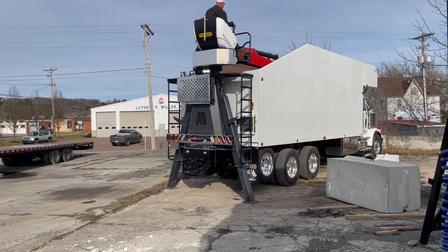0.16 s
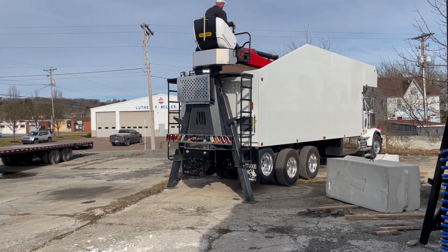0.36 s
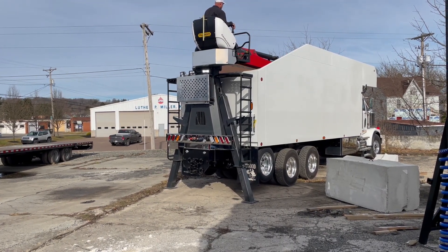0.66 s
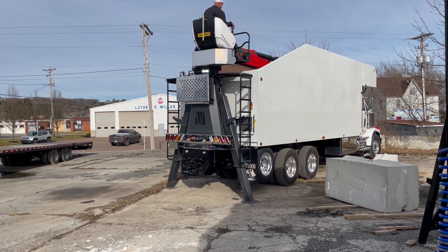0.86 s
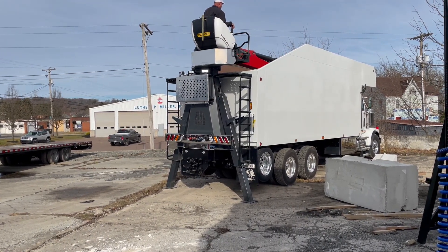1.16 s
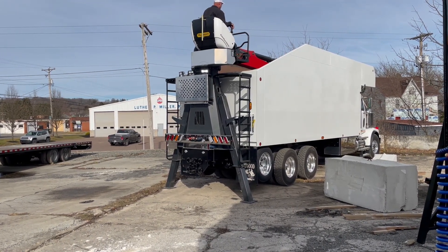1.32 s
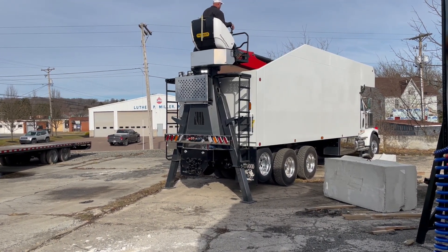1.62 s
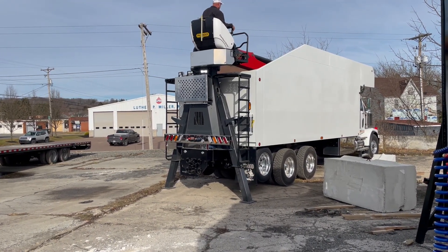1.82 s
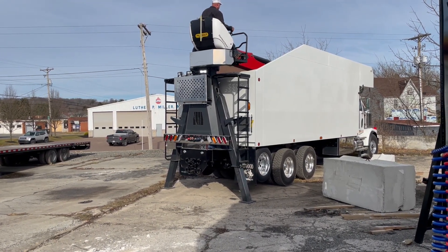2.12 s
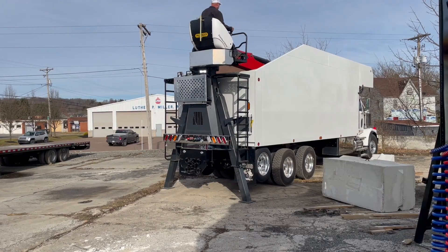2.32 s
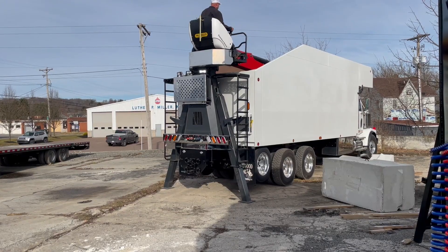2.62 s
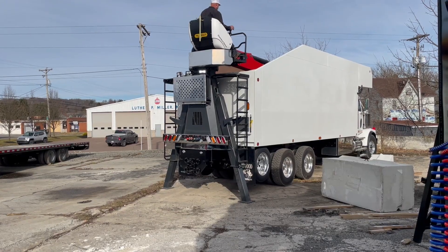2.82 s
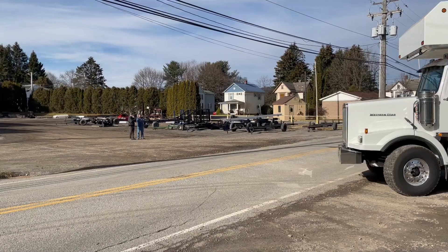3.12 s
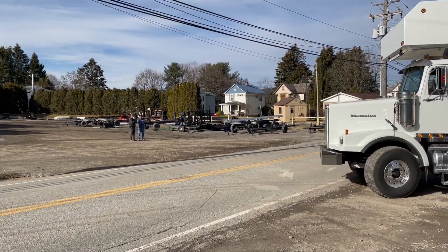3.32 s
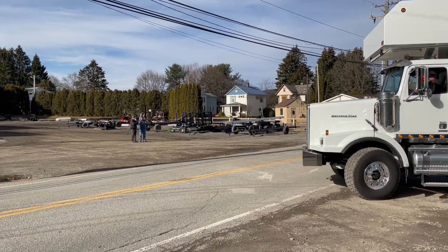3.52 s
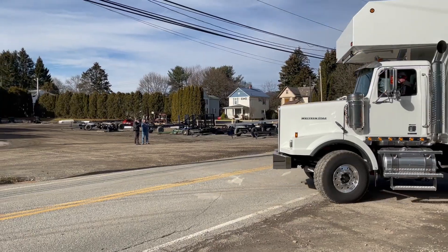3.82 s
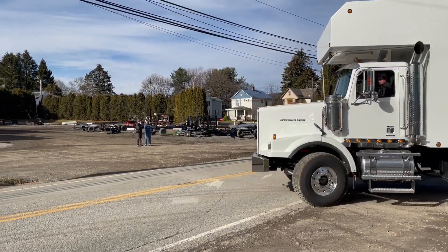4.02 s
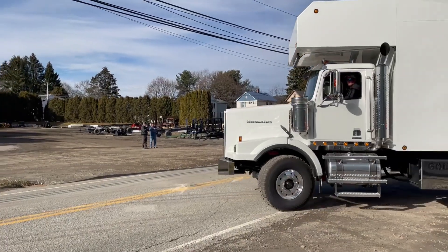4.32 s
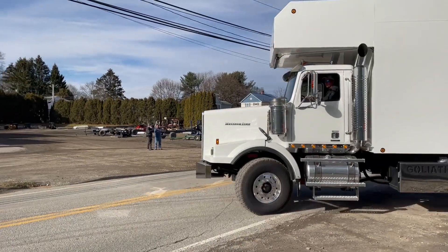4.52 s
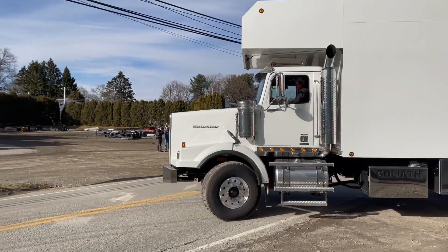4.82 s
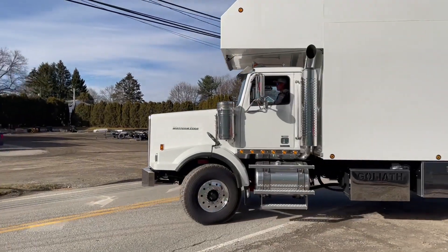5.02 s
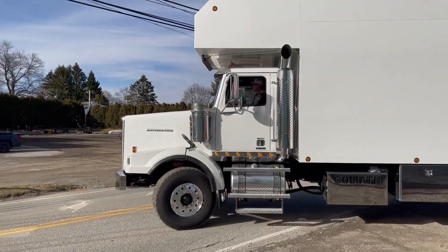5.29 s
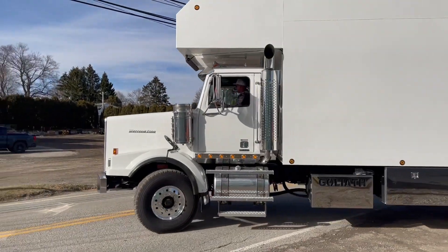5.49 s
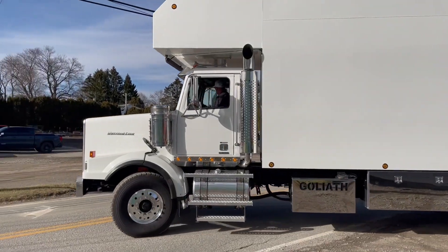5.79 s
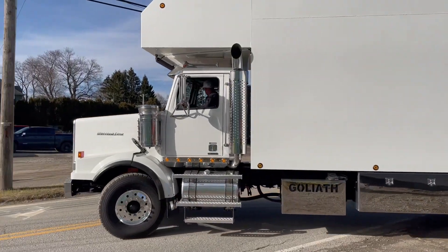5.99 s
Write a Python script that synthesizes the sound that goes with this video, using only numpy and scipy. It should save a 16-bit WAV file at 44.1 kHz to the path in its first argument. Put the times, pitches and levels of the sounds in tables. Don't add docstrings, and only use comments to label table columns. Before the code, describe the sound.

From 0 to 3.1 seconds, a heavy diesel idles fast and steadily in an open yard, its low note deepening under load around 1 second. A hydraulic pump drones near 220 Hz, stronger from 0.1 to 1.1 and again from 2.4, with a thin whine until 1.4. Bright oil hiss sags and nearly shuts off by 2.85. Irregular gusts thump the microphone, notably around 0.55, 1.05 and 2.0. A very brief silence follows, then a hard cut: sharp brake-air puffs at 3.13 and 3.2, with a longer sigh at 3.7. Close by, the truck accelerates, exhaust roar, metallic knock and breathy turbo whistle rising until 4.5. It lifts off; gears rattle, air dumps and a high whistle spins downward as revs fall. From 5.6 tyres scrub with a thin squeal, and at 5.8 the engine pulls again, deep and loud, to the end.

```python
import sys
import numpy as np
from scipy import signal
from scipy.fft import rfft, irfft, next_fast_len
from scipy.io import wavfile
from scipy.ndimage import uniform_filter1d

SR = 44100
rng = np.random.default_rng(int(sys.argv[2]) if len(sys.argv) > 2 else 0)


def pcm_store(signal):
    levels = np.round(np.clip(np.atleast_2d(signal), -1, 1) * 32767)
    wavfile.write(sys.argv[1], SR, levels.astype(np.int16).T)


def gain_from_db(level_db):
    decades = np.asarray(level_db, float) / 20
    return 10 ** decades


N = 271215
TIME_S = np.arange(N) / SR
SIZE = next_fast_len(N + SR)
FREQ = np.arange(SIZE // 2 + 1) * SR / SIZE + 1e-3

# (time [s], firing rate [Hz], exhaust level [dB], throttle [0-1])
DRIVE = [(3.11, 70.48, -11, 0.97), (3.36, 75.78, -11, 1), (3.62, 81.79, -18, 0.97),
         (3.9, 88.2, -15.5, 0.99), (4.33, 91.2, -15, 0.94), (4.5, 90.8, -19, 0.84), (4.6, 82.4, -25, 0.37),
         (5.0, 68.16, -37, 0.3), (5.72, 56.98, -47, 0.05), (5.81, 59.8, -17, 1), (5.9, 62.54, -13, 1),
         (6.15, 65.8, -14.5, 0.98)]


def unit(x):
    return x / np.sqrt(np.mean(x ** 2))


def in_band(x, lo_hz, hi_hz):
    sos = signal.butter(4, [lo_hz, hi_hz], "band", fs=SR, output="sos")
    return x / np.std(signal.sosfilt(sos, x))


def curves(table):
    s, *columns = np.transpose(table)
    return [np.interp(TIME_S, s, c) for c in columns]


def shape(points):
    hz, value = np.transpose(points)
    return np.interp(np.log(FREQ), np.log(hz + 1), value, left=value[0], right=value[-1])


def span(start_s, end_s, edge_s):
    return np.clip(np.minimum(TIME_S - start_s, end_s - TIME_S) / edge_s + 0.5, 0, 1)


def walk(rate_hz):
    k = int(SR / rate_hz)
    held = np.repeat(rng.standard_normal(N // k + 1), k)
    return 1.24 * uniform_filter1d(uniform_filter1d(held, k), k)[:N]


def ring(x, modes):
    out = 0
    for k, (hz, width_hz, db) in enumerate(modes):
        b, a = signal.iirpeak(hz, hz / width_hz, fs=SR)
        out = out + (-1) ** k * gain_from_db(db) * signal.lfilter(b, a, x)
    return out


def hiss(points, gate, flicker_db, rate_hz):
    spectrum = rfft(gate * rng.standard_normal(N), SIZE) * gain_from_db(shape(points))
    lo, hi = points[0][0] / 2, points[-1][0] * 2
    spectrum[(FREQ < lo) | (FREQ > hi)] = 0
    place, out = np.log2(FREQ), 0
    for octave in range(5, 15):
        if lo / 2 < 2 ** octave < hi * 2:
            band = irfft(spectrum * np.clip(1 - abs(place - octave), 0, 1), SIZE)[:N]
            out = out + gain_from_db(flicker_db * walk(rate_hz)) * band
    return out


def tone(hz, wobble_db=2.1, wander=0.1):
    level = np.sqrt(2) * gain_from_db(wobble_db * walk(14))
    return level * np.sin(2 * np.pi * np.cumsum(hz) / SR + wander * walk(9))


def whistle(hz, width_hz):
    sos = signal.butter(2, width_hz / 2, fs=SR, output="sos")
    slow = signal.sosfilt(sos, rng.standard_normal((2, N)))
    return unit(np.real((slow[0] + 1j * slow[1]) * np.exp(2j * np.pi * np.cumsum(hz) / SR)))


def firing(hz, uneven, scatter_db, tail):
    cylinders_db = [-3.5, -2.5, -5.5, -5.5, -2, -2.5]
    turns = np.cumsum(hz) / SR
    count = turns.astype(int)
    chance_db = scatter_db * rng.standard_normal(N // 100)[count]
    size = gain_from_db(uneven * np.array(cylinders_db)[count % 6] + chance_db)
    return size * np.diff(count, prepend=0), size * np.exp(-(turns - count) / tail)


def ports(x, lead, balance, echo):
    t60_s = 0.3
    tail = rng.standard_normal(SR // 2) * gain_from_db(-60 * np.arange(SR // 2) / SR / t60_s)
    tail = rfft(tail / np.linalg.norm(tail), SIZE) * gain_from_db(shape(echo))
    half = gain_from_db(shape(balance) / 2) * np.exp(0.5j * np.interp(FREQ, *np.transpose(lead)))
    both = np.array([half * (1 + tail), (1 - tail) / half])
    return irfft(rfft(x, SIZE) * both, SIZE)[:, :N]


def layer(name):
    # (full-throttle level [dB], loss off throttle [dB], slope with speed [dB/Hz], slope in passing [dB/s])
    layers = dict(stack=(-27, 33, 0.11, -3), roar=(-25, 6.0, 0.1254, 0.86), knock=(-31, 13, 0.19, -0.3),
              air=(-35.5, 0, -0.0365, -2), fan=(-45.5, 7, 0.11, -1), rumble=(-32.5, 1, -0.05, 0.4))
    rattles = dict(case=(-46, -12.5, 0.02, 0), mesh=(-41.5, -8.5, 0.02, 0))
    full_db, lost_db, speed_db, past_db = {**layers, **rattles}[name]
    hz, _, throttle = curves(DRIVE)
    abreast_s = 4.5
    return gain_from_db(full_db - lost_db * (1 - throttle) + speed_db * (hz - 78.5) + past_db * (TIME_S - abreast_s))


def wind():
    # (middle [s], length [s], level [dB], tilt per depth [dB])
    gusts = [(0.014, 0.06, -42, -8), (0.251, 0.068, -21.5, -4.5), (0.393, 0.029, -22.5, -3.5),
             (0.454, 0.029, -22, -4.5), (0.565, 0.044, -15, -5.5), (0.856, 0.091, -23.5, -9),
             (0.957, 0.059, -19, -12.5), (1.063, 0.06, -16, -22), (1.19, 0.037, -20, -11),
             (1.271, 0.071, -23.5, 0.5), (1.48, 0.13, -27, -7), (1.64, 0.17, -37.5, 2),
             (1.983, 0.16, -17.5, -4.5), (2.066, 0.082, -27, -4), (2.164, 0.088, -24, -5),
             (2.304, 0.084, -23, -5.5), (2.495, 0.11, -31, -9), (2.704, 0.13, -28.5, -9)]
    breeze_db, breeze_tilt_db = -31.5, -5.5
    out, lumps = 0, gain_from_db(4.2 * walk(24.96))
    for depth, band_hz in enumerate([(45, 110), (110, 220), (200, 330)]):
        blow = gain_from_db(breeze_db + breeze_tilt_db * depth) * (0.75 + span(1.0, 2.62, 0.3))
        for s, length_s, db, tilt_db in gusts:
            blow = blow + gain_from_db(db + tilt_db * depth) * np.exp(-(2 * (TIME_S - s) / length_s) ** 2)
        noise = rng.standard_normal((2, N)) * lumps
        noise = noise[0] + 0.3 * noise[1] * np.array([[1], [-1]])
        noise = signal.sosfilt(signal.butter(3, band_hz, "band", fs=SR, output="sos"), noise)
        out = out + blow * noise / np.sqrt(uniform_filter1d(noise[0] ** 2, SR // 14) + 1e-9)
    return out


def pump():
    # (multiple of piston rate, lifting level [dB], settled level [dB])
    pump_orders = [(2, -52, -49), (2.2, -60, -47), (2.5, -54, -46), (3, -48, -56), (3.2, -43, -50),
                   (3.5, -45, -40), (4, -49, -56), (5, -50, -53), (5.45, -50, -47), (6, -51, -52),
                   (6.92, -48, -48)]
    # (start [s], end [s], level [dB])
    strokes = [
        (0.14, 1.07, -30.5),
        (2.38, 3.2, -29.5),
    ]
    # (start [s], end [s], frequency [Hz], level [dB])
    whines = [
        (-0.1, 0.8, 2092, -42),
        (0.82, 1.4, 2116, -48),
    ]
    # (time [s], drop [dB])
    shuts = [
        (2.4, 6),
        (2.84, 14),
    ]
    # (frequency [Hz], level [dB])
    oil_colour = [(2500, -4), (4000, -2.5), (6500, 2), (9000, -8), (12000, -8), (13500, -2.5), (15500, -4)]
    # (frequency [Hz], width [Hz], level [dB])
    valve_modes = [(4860, 70, -6), (6400, 100, -5), (8600, 500, -5), (10100, 200, -8), (11000, 200, -10),
                   (15300, 300, -12)]
    piston_hz, rest_db, edge_s = np.full(N, 218.0), -41, 0.04

    stroke = gain_from_db(rest_db) + sum(gain_from_db(db) * span(a, b, edge_s) for a, b, db in strokes)
    out = stroke * tone(piston_hz, wobble_db=0.8, wander=0.2)
    settled = np.clip((TIME_S - 1.0) / 1.1, 0, 1)
    for k, lifting_db, settled_db in pump_orders:
        level = gain_from_db(lifting_db + (settled_db - lifting_db) * settled)
        out = out + level * tone(k * piston_hz, wobble_db=3.0, wander=1.0)
    for start_s, end_s, hz, db in whines:
        whine = tone(np.full(N, float(hz)), wobble_db=1.0, wander=0.1)
        out = out + gain_from_db(db) * span(start_s, end_s, edge_s) * whine
    oil_db = -47 - 1.0 * TIME_S ** 2 - sum(db * span(s, 20, edge_s) for s, db in shuts)
    oil = unit(hiss(oil_colour, 1, flicker_db=2.2, rate_hz=7.0))
    oil = oil + gain_from_db(15.5) * ring(rng.standard_normal(N), valve_modes)
    return out + gain_from_db(oil_db) * in_band(oil, 9500, 12400)


def idle_engine():
    # (frequency [Hz], level [dB])
    clatter_colour = [(40, -26), (100, 8), (300, -12), (500, -3), (800, -5), (1300, -8), (2000, -12),
                      (3000, -18.5), (4500, -25.5), (7000, -27.5), (12000, -46.5)]
    load = span(0.94, 20, 0.27)
    light_hz, loaded_hz = 55.73, 57.24
    first_light_db, first_loaded_db = -41, -24
    second_db, clatter_db = -27.5, -34.5
    hz = light_hz + (loaded_hz - light_hz) * load
    first_db = first_light_db + (first_loaded_db - first_light_db) * load
    _, burst = firing(hz, uneven=0.26, scatter_db=0.8, tail=0.71)
    clatter = in_band(hiss(clatter_colour, 2.0 + burst, flicker_db=-1.0, rate_hz=5.94), 610, 1350)
    first = gain_from_db(first_db) * tone(hz, wobble_db=2.0)
    second = gain_from_db(second_db) * tone(2 * hz, wobble_db=2.6, wander=0.36)
    return first + second + gain_from_db(clatter_db) * clatter


def rolling():
    # (frequency [Hz], level [dB])
    rumble_colour = [(30, -17), (55, 6.5), (110, 0.5), (180, -5), (300, -10), (420, -18.5)]
    scrub_s, rise_s, scrub_db = 5.6, 0.3, -34.5
    from_hz, to_hz, glide_s = 5250, 4550, 0.25
    since_s = np.maximum(TIME_S - scrub_s + rise_s / 2, 0)
    hz = to_hz + (from_hz - to_hz) * np.exp(-since_s / glide_s)
    scrub = gain_from_db(scrub_db + 1.5 * walk(30)) * span(scrub_s, 20, rise_s) * whistle(hz, width_hz=260)
    rumble = in_band(hiss(rumble_colour, 1, flicker_db=1.5, rate_hz=11), 116, 176)
    return layer("rumble") * rumble + scrub


def brake_air():
    # (time [s], level [dB], dying time [s])
    puff_events = [
        (3.135, -23.5, 0.021),
        (3.21, -23.5, 0.023),
        (3.46, -34, 0.072),
        (3.72, -33.5, 0.29),
    ]
    # (frequency [Hz], width [Hz], level [dB])
    nozzle_modes = [(3470, 350, 3.5), (5400, 260, 1.5), (4270, 240, -10), (6750, 2100, -14.5),
                    (10600, 3000, -14)]
    rise_s, puffs = 0.026, 0
    for s, db, fall_s in puff_events:
        puffs = puffs + gain_from_db(db) * np.exp(np.minimum((TIME_S - s) / rise_s, (s - TIME_S) / fall_s))
    return puffs * unit(ring(rng.standard_normal(N), nozzle_modes))


def turbo():
    # (time [s], shaft whistle [Hz], level [dB])
    shaft_curve = [(3.11, 5300, -38.5), (3.3, 5300, -38.5), (3.55, 5600, -45), (3.85, 6050, -38.5),
                   (4.15, 6500, -39.5), (4.55, 6600, -41), (4.8, 6250, -41), (5.6, 6050, -42.5),
                   (6.15, 5900, -50)]
    hz, db = curves(shaft_curve)
    blade_db, dump_db = -43, -38.5
    since_s = TIME_S - 4.62
    dying_db = np.minimum(60 * since_s, -8 * since_s)
    blade_hz = 12700 - 3300 * np.clip(since_s - 0.1, 0, 2)
    shaft = whistle(hz + 60 * walk(10), width_hz=440)
    blade = whistle(blade_hz, width_hz=600)
    dumped = whistle(np.full(N, 10500.0), width_hz=4000)
    flutter_db = 2.0 * walk(60) + 2.2 * walk(12)
    spin_down = gain_from_db(blade_db + flutter_db) * blade + gain_from_db(dump_db) * dumped
    return gain_from_db(db + flutter_db) * shaft + gain_from_db(dying_db) * spin_down


def exhaust_orders(hz, first_db, throttle):
    chamber_db, chamber_hz, width_hz = -14.5, 275.7, 13
    third = gain_from_db(chamber_db) * throttle ** 2 / (1 + ((3 * hz - chamber_hz) / width_hz) ** 2)
    second = gain_from_db(first_db - 11.5 - 1.8 * (hz - 54.5))
    out = gain_from_db(first_db) * tone(hz, wobble_db=1.2) + third * tone(3 * hz, wobble_db=0.8)
    return out + second * tone(2 * hz)


def block_knock(hz):
    # (frequency [Hz], width [Hz], level [dB])
    block_modes = [(1750, 55, 0), (1530, 60, -10), (1350, 60, -8), (1170, 50, -9)]
    bang, burst = firing(hz, uneven=3.0, scatter_db=1.2, tail=0.5)
    knock = ring(bang + 0.07 * burst * rng.standard_normal(N), block_modes)
    return layer("knock") * in_band(knock, 1650, 1850)


def gear_rattle(hz, throttle):
    # (frequency [Hz], width [Hz], level [dB])
    case_modes = [(2335, 40, 0), (2520, 35, -7), (2830, 40, -8), (3060, 45, -9), (950, 40, -9),
                  (1340, 50, -10)]
    slack_s, slack_db, slack_decay_s = 4.67, 7.0, 0.12
    slack = gain_from_db(slack_db * np.exp(-((TIME_S - slack_s) / slack_decay_s) ** 2))
    strikes, burst = firing(hz, uneven=0.4, scatter_db=2.0, tail=0.5)
    case = in_band(ring(strikes + 0.04 * burst * rng.standard_normal(N), case_modes), 2200, 2450)
    mesh_hz = uniform_filter1d(4050 + 250 * throttle, SR // 5) + 50 * walk(8)
    mesh = unit((0.12 + burst) * whistle(mesh_hz, width_hz=230))
    return slack * layer("case") * case + layer("mesh") * mesh


def road_engine():
    # (frequency [Hz], width [Hz], level [dB])
    stack_modes = [(135, 40, -5), (295, 40, 0), (350, 30, 0), (468, 22, 4)]
    # (frequency [Hz], level [dB])
    roar_colour = [(150, -27), (250, 5), (330, 1), (450, -1.5), (800, -2.5), (1300, -4.5), (2000, -8.5),
                   (3000, -39.5)]
    air_colour = [(1200, -1), (2000, 4), (3000, 2.5), (4500, 0.5), (6500, -3.5), (8000, -2.5),
                  (10000, -16.5)]
    fan_colour = [(5500, 4), (7000, 11.5), (9000, 10.5), (12000, -9.5), (13500, -22), (15500, -16)]
    hz, first_db, throttle = curves(DRIVE)
    pulses, burst = firing(hz, uneven=1.2, scatter_db=2.5, tail=0.35)
    stack = unit(ring(pulses, stack_modes))
    roar = in_band(hiss(roar_colour, 6.2 + burst, flicker_db=-0.5, rate_hz=6.2), 436, 1300)
    air = in_band(hiss(air_colour, 3.6 + burst, flicker_db=2.0, rate_hz=14), 2340, 4140)
    fan = in_band(hiss(fan_colour, 0.34 + burst, flicker_db=4.5, rate_hz=8), 9230, 12200)
    flow = layer("stack") * stack + layer("roar") * roar + layer("air") * air + layer("fan") * fan
    return exhaust_orders(hz, first_db, throttle) + flow + block_knock(hz) + gear_rattle(hz, throttle)


def scene():
    # (frequency [Hz], lead of left port [rad])
    yard_lead = [(0, 0), (1900, .1), (2760, 1), (4300, .5), (4750, .1), (5500, .1), (6950, 3), (8200, 3.3),
                 (10400, 6.15), (11900, 6.4), (13600, 9.3), (14900, 9.5), (15800, 11)]
    road_lead = [(0, 0), (520, -.4), (860, .2), (1900, -.8), (3100, .5), (4800, .1), (6000, -1),
                 (6550, -.6), (7650, -3), (8850, -3.3), (10500, -6.1), (12500, -6.4), (13800, -9.3),
                 (15800, -9.5)]
    # (frequency [Hz], left minus right [dB])
    yard_balance = [(60, -0.5), (110, 0.0), (200, 0.0), (380, 0.0), (700, 0.5), (1290, 0.0), (2380, -0.5),
                    (4400, -1.0), (8120, 0.0), (15000, 0.0)]
    road_balance = [(60, -1.0), (110, -1.0), (200, -1.5), (380, -1.5), (700, -0.5), (1290, 3.5),
                    (2380, 3.5), (4400, 1.5), (8120, 0.0), (15000, 0.0)]
    # (frequency [Hz], level re direct sound [dB])
    yard_echo = [(60, -20), (200, -10), (600, -7), (1500, -16), (3000, -10), (5000, -16), (8000, -26),
                 (15000, -22)]
    road_echo = [(60, -24), (130, -14), (270, -18), (600, -7), (1500, -9), (3000, -7), (5000, -8),
                 (8000, -26), (15000, -24)]
    yard_end_s, road_start_s = 3.0813, 3.1059
    yard = ports(idle_engine() + pump(), yard_lead, yard_balance, yard_echo) + wind()
    truck = rolling() + brake_air() + turbo() + road_engine()
    road = ports(truck, road_lead, road_balance, road_echo)
    return yard * (TIME_S < yard_end_s) + road * (TIME_S >= road_start_s)


def low_pass(x):
    return signal.sosfilt(signal.butter(12, 15940, fs=SR, output="sos"), x)


def record(dry):
    rounded = np.tanh(0.65 * dry) / 0.65
    return low_pass(rounded)


dry = scene()
out = record(dry)
pcm_store(out)
```